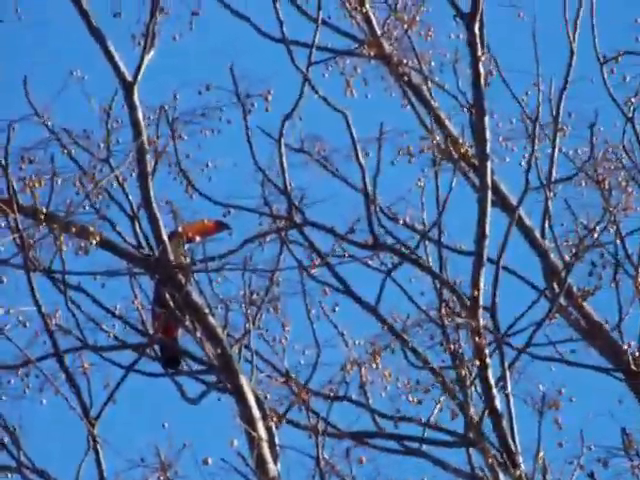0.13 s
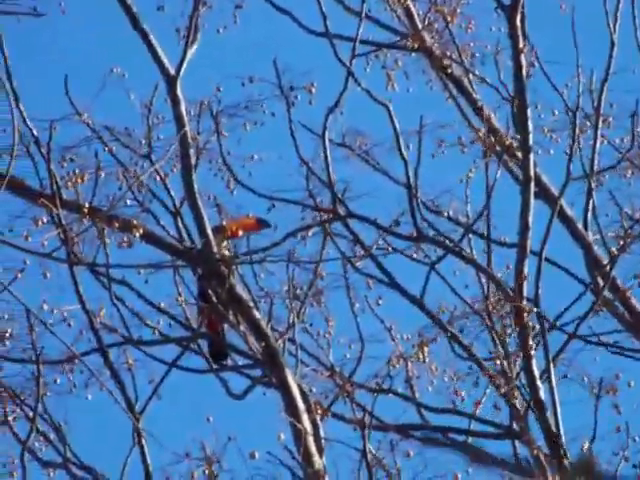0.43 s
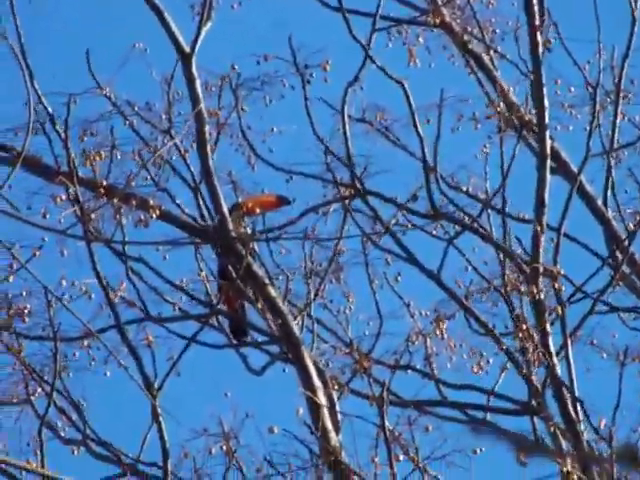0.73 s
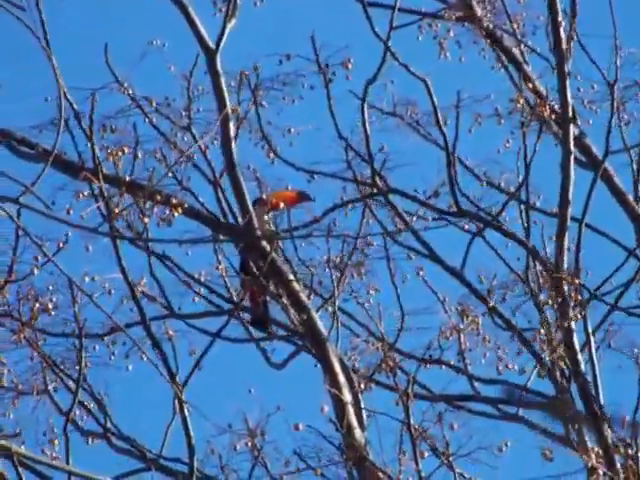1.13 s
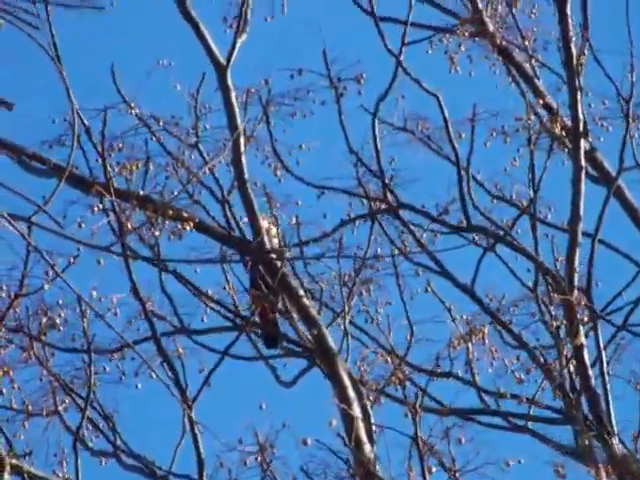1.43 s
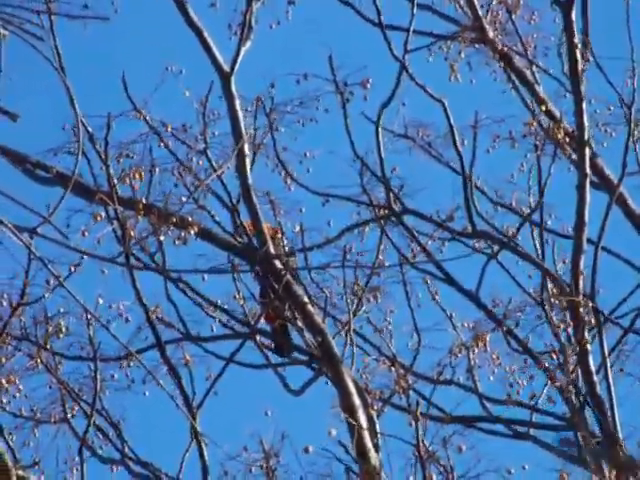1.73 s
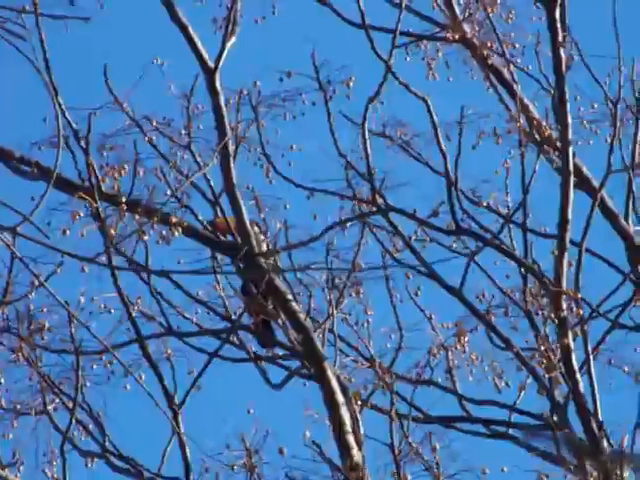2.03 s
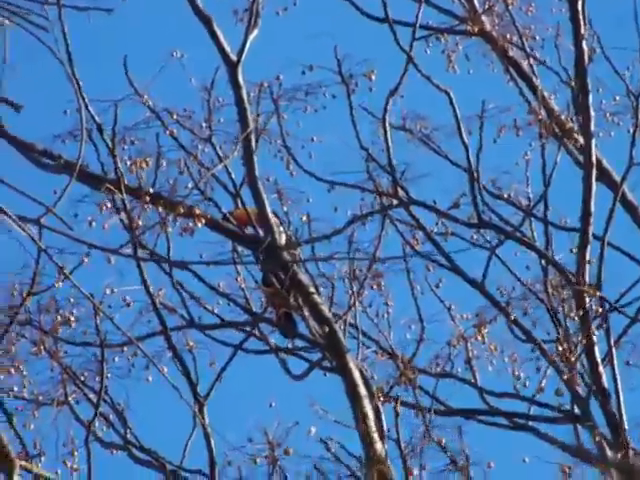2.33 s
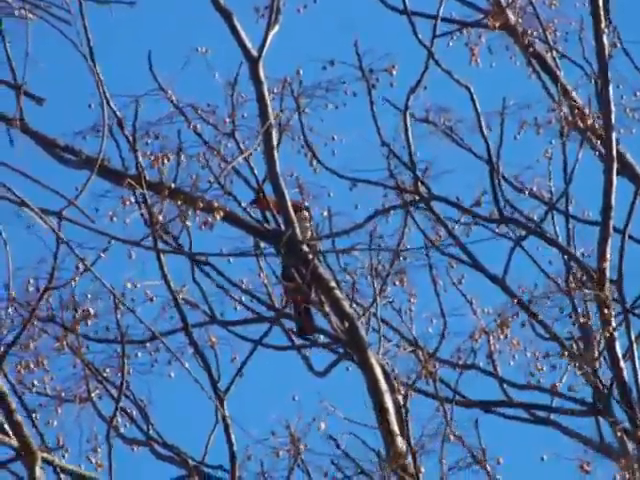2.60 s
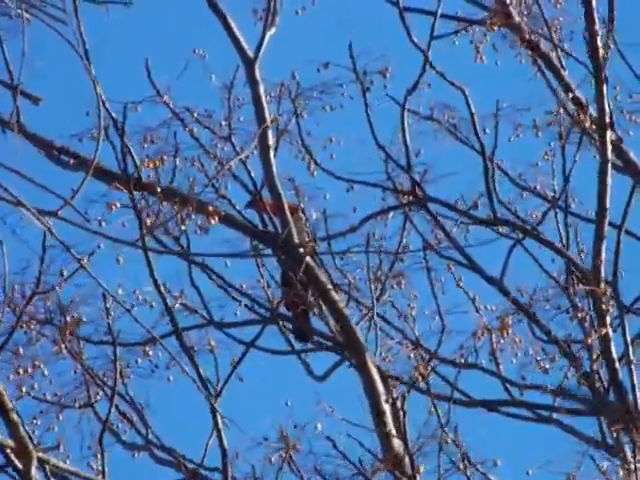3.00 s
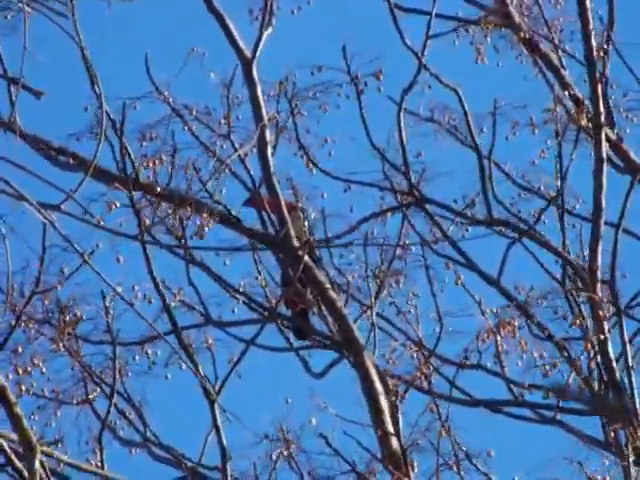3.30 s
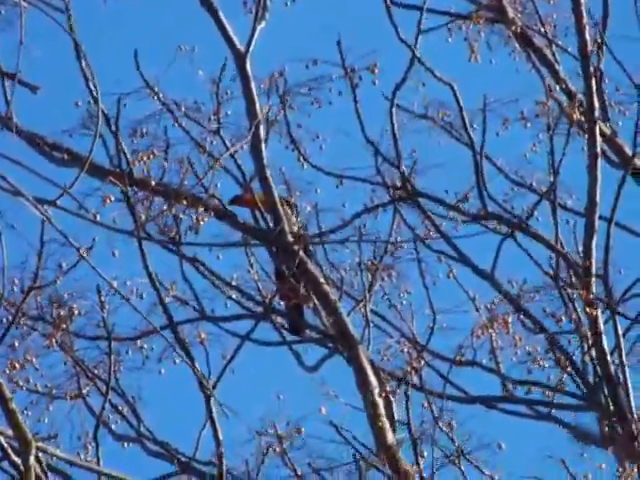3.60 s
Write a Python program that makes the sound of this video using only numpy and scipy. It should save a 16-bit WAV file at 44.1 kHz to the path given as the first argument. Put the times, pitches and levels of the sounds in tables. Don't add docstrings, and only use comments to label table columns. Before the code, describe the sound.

A large bird perched some distance up in bare trees croaks once at about 2.5 s: seven dry, bill-ringing snaps in roughly 0.15 s, slowing slightly, strongest near the end, with a brief faint outdoor echo. Throughout 0-4 s, low wind rumbles on the hand-held microphone, with soft thumps and flutters, notably near 0.25, 2.05 and 2.9 s, over faint steady hiss and a dim throbbing distant drone.

```python
import sys
import numpy as np
from scipy import signal
from scipy.fft import rfft, irfft
from scipy.io import wavfile
from scipy.ndimage import uniform_filter1d

SR = 44100
rng = np.random.default_rng(int(sys.argv[2]) if len(sys.argv) > 2 else 0)


def ratio_of_db(decibels):
    return 10 ** (np.asarray(decibels, float) / 20)


def dump(signal):
    limited = np.clip(np.atleast_2d(signal).T, -1, 1)
    pcm = np.round(limited * 32767).astype(np.int16)
    wavfile.write(sys.argv[1], SR, pcm)


N = 165375

# time in seconds, rumble level in dB.
GUST = [(0, -41), (.08, -47), (.2, -44), (.42, -41), (.5, -48), (.65, -42), (.9, -46), (1.1, -48.5),
        (1.28, -42), (1.45, -49.5), (1.55, -38.5), (2.1, -40), (2.2, -44), (2.5, -40.5), (2.97, -41.5),
        (3.07, -46), (3.3, -52.5), (3.75, -44)]


def band(x, hz, width):
    return signal.lfilter(*signal.iirpeak(hz, hz / width, fs=SR), x)


def unit(x):
    return x / np.sqrt(np.mean(x ** 2))


def walk(rate):
    hold = int(SR / rate)
    steps = np.repeat(rng.standard_normal(N)[:N // hold + 1], hold)
    slewed = uniform_filter1d(uniform_filter1d(steps, hold), hold)
    return 1.26 * slewed[:N]


def shimmer(table, shared_db, flicker_db, rate):
    hz, db = np.array(table).T
    f = np.fft.rfftfreq(N, 1 / SR) + 1
    colour = ratio_of_db(np.interp(np.log(f), np.log(hz), db, left=-60, right=-60))
    centres = 20 * 2 ** (np.arange(28) / 3)
    out = 0
    for centre in centres[(centres > hz[0]) & (centres < hz[-1])]:
        share = np.cos(np.pi / 2 * np.clip(3 * np.log2(f / centre), -1, 1))
        noise = irfft(rfft(rng.standard_normal(N)) * colour * share, N)
        out = out + noise * ratio_of_db(flicker_db * walk(rate))
    return unit(out) * ratio_of_db(shared_db)


def gust_db(t):
    return np.interp(t, *np.array(GUST).T)


def wind(t):
    # frequency in Hz, density in dB per Hz.
    rumble = [(13, -51), (22, -12.5), (59, -1), (91, 0), (188, -9), (296, -21), (360, -21), (600, -33),
              (780, -62), (1320, -120)]
    # centre in seconds, peak in dB, pitch in Hz, length in cycles.
    bumps = [(0.232, -42, 180, 2.9), (0.236, -24, 102, 0.76), (0.282, -28.5, 268, 1.57),
             (0.285, -21.5, 107, 0.63), (0.635, -49, 187, 1.5), (0.669, -33, 97, 1.5),
             (1.562, -29.5, 67.6, 2.6), (1.589, -35.5, 194, 1.46), (1.619, -36, 87, 0.51),
             (1.692, -31.5, 91.5, 2.6), (1.847, -34, 99, 2.5), (1.889, -29, 100, 1.05),
             (1.889, -34.5, 180, 1.5), (1.925, -39, 209, 2.5), (2.047, -24.5, 104.4, 1.77),
             (2.048, -25, 159, 1.5), (2.123, -35, 197, 1.5), (2.365, -36, 97.5, 1),
             (2.509, -39.5, 184, 2.8), (2.534, -28.5, 102, 1.1), (2.56, -28, 105, 1.5),
             (2.736, -33.5, 102, 1.5), (2.86, -25, 190, 1.43), (2.868, -28.5, 91.5, 0.5),
             (2.888, -35, 187, 2.6), (2.892, -29, 148, 2.8), (2.939, -33.5, 194, 1.5),
             (2.961, -36, 178, 1.54), (3.29, -32, 72, 2), (3.455, -30.5, 195, 1.36)]
    # centre in seconds, peak in dB, pitch in Hz, length
    more_bumps = [(0.273, -32.5, 398, 1.75), (0.298, -27.5, 103.5, 1), (0.651, -46, 395, 2.9),
                  (.655, -38, 197, 3.25), (0.901, -46.5, 194, 1.9), (1.269, -50.5, 480, 7.6),
                  (1.92, -44, 420, 1.7), (2.171, -51, 396, 3.8), (3.36, -42.5, 198, 2.9),
                  (3.425, -37, 89, 1.7), (3.266, -37.5, 140, 2.4), (2.77, -38, 159, 2.7),
                  (.4, -42.5, 245, 2.7), (.635, -44, 298, 2.8), (2.045, -48, 367, 2), (2.54, -49.5, 400, 4.2),
                  (2.858, -39, 370, 2.2), (2.889, -37.5, 360, 1.8), (3.14, -37.5, 128, 1.6),
                  (3.139, -39, 248, 2.04), (3.281, -42, 238, 1.3), (3.456, -44, 400, 1.6),
                  (3.745, -41, 240, 2.2)]
    eddy_gain_db = 0.5
    out = shimmer(rumble, gust_db(t) + 2.0 * walk(35), 0.7, 9)
    for at, db, hz, cycles in [*bumps, *more_bumps]:
        age = (t - at) * hz / np.clip(cycles, .6, 8)
        swing = np.exp(-2.8 * age ** 2) * np.sin(2 * np.pi * hz * (t - at))
        masking = 1 - 0.24 * np.exp(-2 * age ** 2)
        out = out * masking + ratio_of_db(db + eddy_gain_db) * swing
    low_cut = signal.butter(2, 32, "high", fs=SR, output="sos")
    return signal.sosfilt(low_cut, out)


def far_hiss(t):
    # frequency in Hz, density in dB per Hz.
    hiss_colour = [(300, -18), (345, -9.5), (480, -7.5), (800, -9), (1330, -14.5), (3000, -19),
                   (6500, -20.5), (9000, -22)]
    gust = gust_db(t)
    level_db = -59 + 0.14 * (gust - gust.mean()) + .5 * walk(9.8)
    return shimmer(hiss_colour, level_db, 0.25, 4.3)


def far_drone():
    # frequency in Hz, width in Hz, level in dB.
    tones = [(480, 90, -68), (874, 76, -66.5), (1106.6, 122, -65.5)]
    throb_db = 1.4 * walk(13)
    out = 0
    for hz, width, db in tones:
        tone = band(band(rng.standard_normal(N), hz, width), hz, width)
        out = out + unit(tone) * ratio_of_db(db + throb_db + 1.3 * walk(7))
    return out


def ring(x, hz, width, db):
    return ratio_of_db(db) * band(band(x, hz, 2 * width), hz, width) * SR / width / 10


def throat_ring(x):
    # frequency in Hz, width in Hz, level in dB.
    modes = [(1560, 200, -3.5), (1800, 360, 0), (2260, 770, -6)]
    return sum((-1) ** i * ring(x, *mode) for i, mode in enumerate(modes))


def bill_ring(x, gape_hz):
    # frequency in Hz, width in Hz, level in dB.
    modes = [(3950, 340, -1), (4600, 500, -7), (5090, 730, -8.5), (6100, 760, -9)]
    main = ring(x, gape_hz, 520, 3.5)
    return main - sum((-1) ** i * ring(x, *mode) for i, mode in enumerate(modes))


def croak(t):
    # time in seconds, effort in dB, bill brightness in dB, main bill resonance in Hz.
    shaping = [
        (2.525, -10.5, -8, 3300),
        (2.545, -3, -4, 3850),
        (2.565, -11.5, 8, 2810),
        (2.587, -5, 1, 2710),
        (2.611, 0, 1, 3330),
        (2.635, 2, -1.5, 2850),
        (2.66, 0.5, -4.5, 2780),
    ]
    # delay in seconds, drive of throat in dB, drive of bill in dB.
    slaps = [
        (0, -13, -0.5),
        (.0014, 4, 1),
        (.0027, -24, -7),
    ]
    start_s, span_s, level_db = 2.5244, .6, -33.5
    snaps, period_s, slowing_s = 7, .0186, .00064
    slap_scatter_db = 0.5
    puff_s, rasp_db, throat_rasp_db = 0.0052, -20.5, -12.5
    echo_s, echo_db, echo_bill_db = .0065, -6, -5
    trees_t60_s, trees_delay_s, trees_db = 0.24, .005, -29
    answer_bill_db = 0.5

    when, effort, bright, gape = np.array(shaping).T
    lag, throat_db, bill_db = np.array(slaps).T
    t = t[:int(span_s * SR)]
    echo = int(echo_s * SR)
    voice = 0
    for k, chance in enumerate(rng.standard_normal((snaps, len(slaps)))):
        at = k * period_s + k ** 2 * slowing_s
        push, edge, gape_hz = (np.interp(start_s + at, when, v) for v in (effort, bright, gape))
        age = np.clip(t - at, 0, 1)
        air = rng.standard_normal((3, len(t)))

        high = ratio_of_db(rasp_db) * age / puff_s * np.exp(-(age / puff_s) ** 2) * air[0]
        low = high * ratio_of_db(throat_rasp_db)
        place = ((at + np.round(lag * gape_hz) / gape_hz) * SR).astype(int)
        low[place] += ratio_of_db(throat_db + slap_scatter_db * chance)
        high[place] += ratio_of_db(bill_db + slap_scatter_db * chance)

        scatter = ratio_of_db(trees_db - 60 * age / trees_t60_s) * np.clip(age / trees_delay_s, 0, 1) ** 2
        low += ratio_of_db(echo_db) * np.roll(low, echo) + scatter * air[1]
        bill_echo = ratio_of_db(echo_db + echo_bill_db) * np.roll(high, echo)
        high += ratio_of_db(answer_bill_db) * (bill_echo + scatter * air[2])

        voice = voice + ratio_of_db(push) * (throat_ring(low) + ratio_of_db(edge) * bill_ring(high, gape_hz))
    start = int(start_s * SR)
    return ratio_of_db(level_db) * np.pad(voice, (start, N - start - len(t)))


def scene():
    t = np.arange(N) / SR
    return (wind(t) + far_hiss(t) + far_drone() + croak(t))[None]


def band_limit(x):
    return signal.sosfilt(signal.butter(12, 8260, fs=SR, output="sos"), x)


def record(dry):
    # frequency in Hz, width in Hz.
    gaps = [(299, 22.6), (964, 15)]
    grit_db, grit_s = -25.5, .004
    roll_off_hz, span_hz, roll_off_db, power = 6500, 2030, -34, 1.93
    size = uniform_filter1d(np.abs(dry), int(grit_s * SR) + 1)
    mix = dry + ratio_of_db(grit_db) * size * band(rng.standard_normal(N), 7800, 5900)
    for hz, width in gaps:
        mix = signal.filtfilt(*signal.iirnotch(hz, hz / width, fs=SR), mix)
    over = np.clip((np.fft.rfftfreq(N, 1 / SR) - roll_off_hz) / span_hz, 0, 2)
    mix = irfft(rfft(mix) * ratio_of_db(roll_off_db * over ** power), N)
    return band_limit(mix)


dry = scene()
out = record(dry)
dump(out)
```